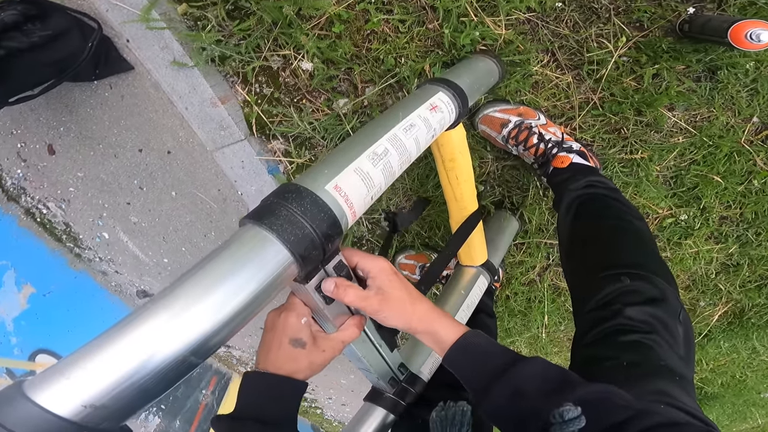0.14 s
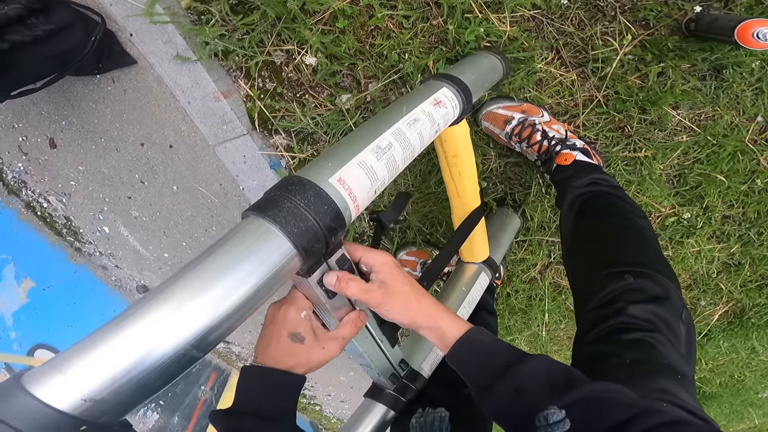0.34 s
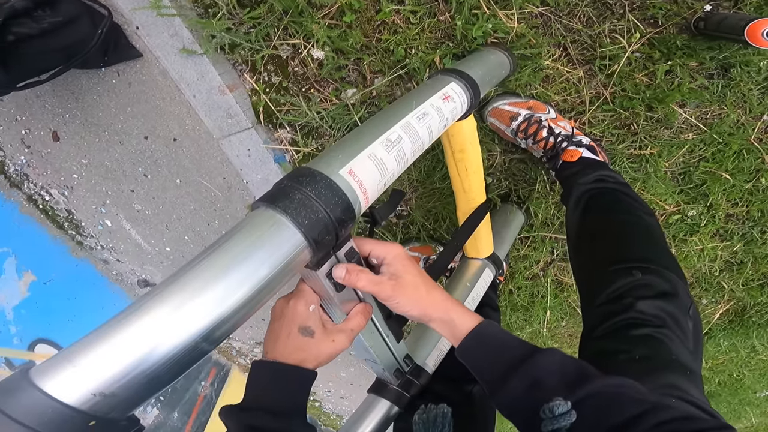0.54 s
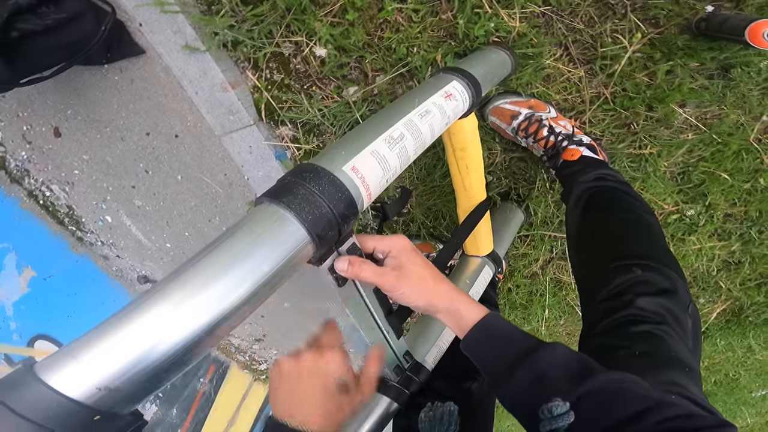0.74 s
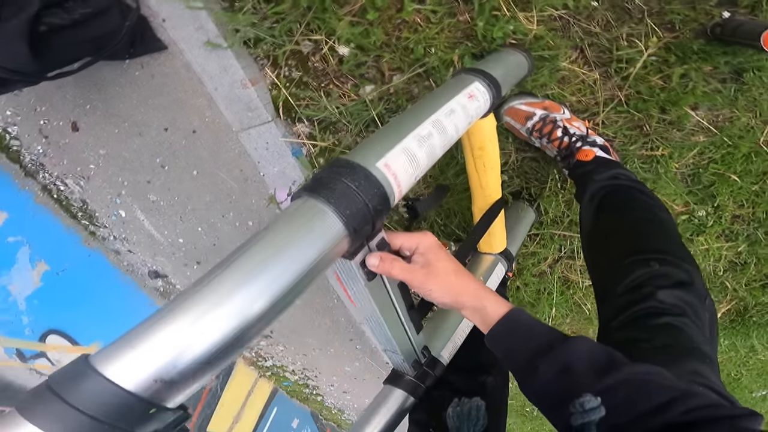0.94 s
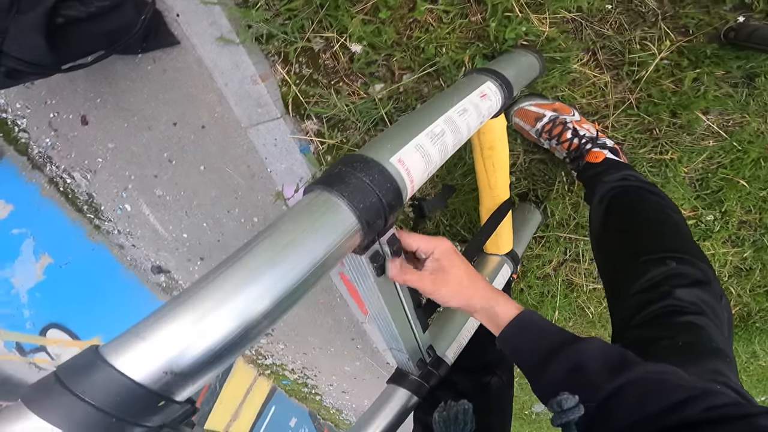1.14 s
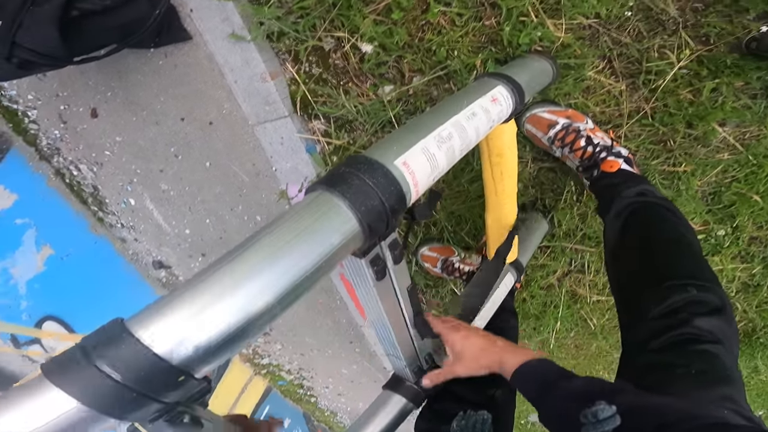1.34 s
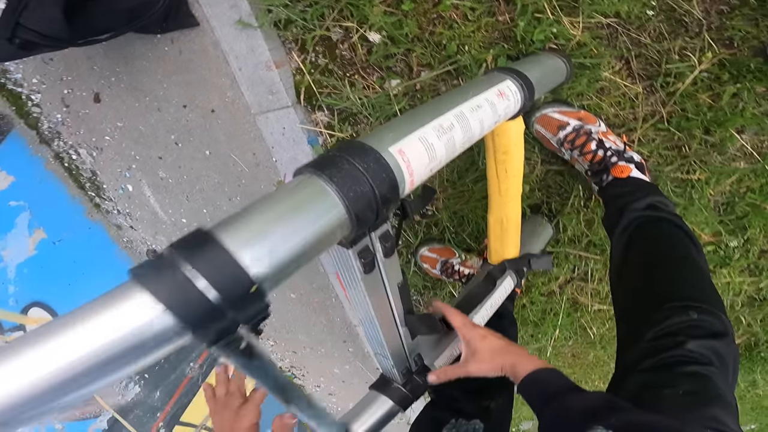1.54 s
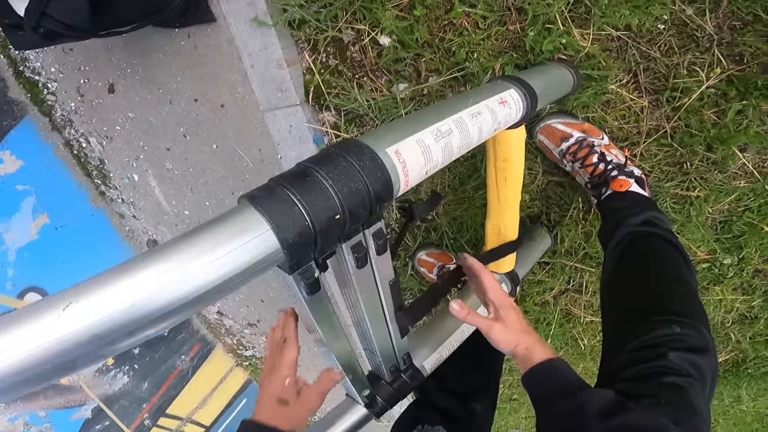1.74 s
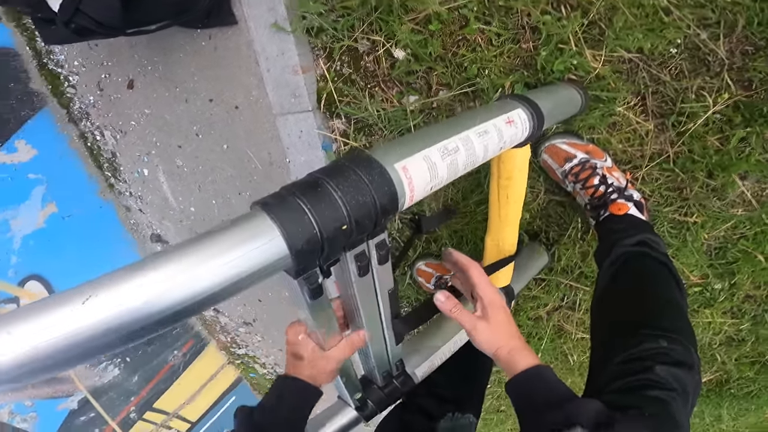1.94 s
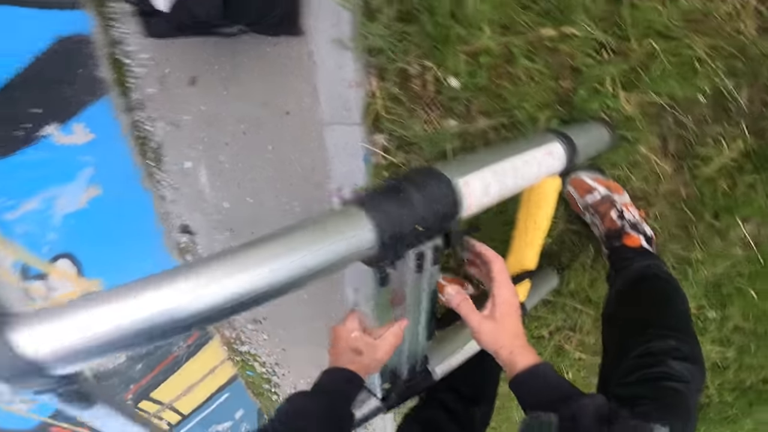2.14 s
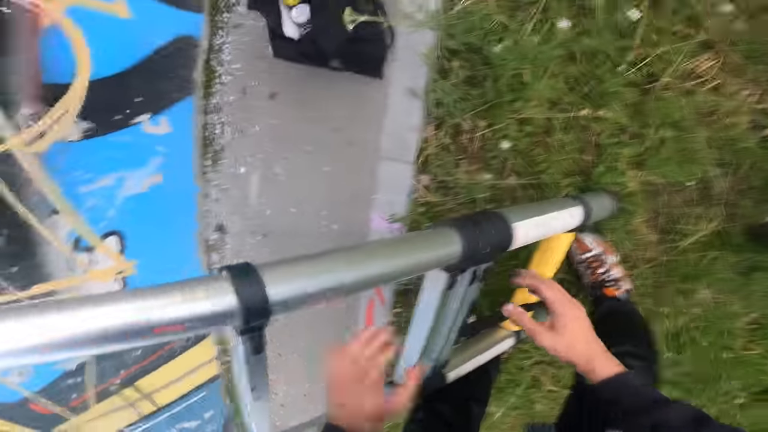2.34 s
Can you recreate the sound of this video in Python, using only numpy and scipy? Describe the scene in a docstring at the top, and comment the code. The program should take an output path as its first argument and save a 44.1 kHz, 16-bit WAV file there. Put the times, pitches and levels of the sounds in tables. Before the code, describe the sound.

A telescopic aluminium ladder is worked by hand, heard close: small plastic clicks, a latch snap, a half-second rasping tube slide, then a hard clack and thud, over low engine-like drone and distant traffic outdoors.

```python
"""A telescopic aluminium ladder is extended by hand outdoors, heard from close by.
Plastic catches click, a latch snaps free, the tubes slide for about half a second and the section
locks with a clack and a thud. Hits are short noise bursts plus decaying sine waves; the slide is
noise mixed with dense tiny grains. Behind it are a low engine-like drone made of two sines, distant
traffic and a sleeve rustle made of coloured noise, and one faint chirp made of gliding sines."""
import sys
import numpy as np
from scipy import signal
from scipy.fft import rfft, irfft
from scipy.io import wavfile
from scipy.ndimage import uniform_filter1d

SR = 44100
rng = np.random.default_rng(int(sys.argv[2]) if len(sys.argv) > 2 else 0)


def unload_wav(signal):
    """Save mono or channel-first audio to the path in sys.argv[1] as 16-bit WAV at rate SR, clipped to [-1, 1]."""
    wavfile.write(
        sys.argv[1],
        SR,
        np.round(np.clip(np.atleast_2d(signal).T, -1, 1) * 32767).astype(np.int16),
    )


N = 105840
T = np.arange(N) / SR  # time of each sample in seconds


def catches():
    """Thumbs work the plastic catches and sections knock in their collars; each click has its own body."""
    # clicks: t/s, level/dB, body f/Hz, body width/octaves, body lift/dB, treble/dB, t60/s
    clicks = [(0.0519, -40, 1870, .12, 12, -4.5, 0.048), (0.1423, -46, 5500, .36, 1, 10, 0.014),
              (.151, -24.5, 3800, 0.23, 10, -9, 0.055), (.153, -37, 864, 0.18, 26, -12, .012),
              (0.1755, -22.5, 2420, 0.12, 10.5, 6.5, 0.021), (0.1786, -28.5, 553, 0.27, 8, -3, 0.037),
              (.179, -26, 4200, 0.2, 15, -6, 0.017), (0.2435, -36.5, 4850, 0.48, 4, 18.5, 0.038),
              (0.3083, -48.5, 4500, .36, 5, -2, 0.0098), (0.3587, -43, 3550, 0.25, 11.5, 15.5, 0.047),
              (0.5824, -49.5, 4500, .36, 8, 18, 0.09), (0.6067, -41.5, 4600, 0.51, 9, 18, 0.035),
              (0.74, -40.5, 3500, 0.31, -4, -3, 0.079), (0.755, -37.5, 3470, 0.29, 13, 14.5, 0.061),
              (0.797, -22.5, 3080, 0.33, 12.5, -17, 0.042), (0.9139, -47, 5530, 0.4, 3, 13, 0.027),
              (1.0308, -37, 5300, .36, -3.5, 13, 0.044), (1.187, -31.5, 3330, .3, 3, -36, 0.07),
              (1.2787, -38, 1450, 0.83, 13, -36, 0.058), (1.6977, -20.5, 2080, 0.28, 9, -13, 0.018),
              (1.707, -19.5, 4650, 0.12, 10, 19, 0.017), (1.798, -33.5, 1255, 0.39, 13, -10, 0.048),
              (1.838, -41, 749, 0.36, 10, -21, 0.03), (1.966, -41.5, 6000, .36, -3, 11, 0.036),
              (2.363, -36.5, 1266, 0.56, 28, 10, 0.033)]
    # basic colour of the plastic: f/Hz, level/dB
    plastic_colour = [(180, -32), (300, -13), (535, 0.5), (700, -6), (900, -3.5), (2000, -1.5),
                      (2310, -3.5), (4190, -3), (5510, -5), (6070, -5), (7480, -16.5), (9830, -20),
                      (14000, -48)]
    # ringing tones of the plastic catch and its collar: f/Hz, level/dB, t60/s
    collar_modes = [(545, -7.5, 0.028), (854, -1, 0.064), (1323, 4, 0.041), (2282, -2, 0.052),
                    (3054, -5, 0.087), (3380, -7, 0.028), (3730, 0.5, 0.047), (3660, -18, 0.061),
                    (4390, -12, 0.054)]
    treble_hz, snap, ring_db = 6580, 0.22, -11.5
    plastic = gains(plastic_colour)
    treble = 1 / (1 + (treble_hz / bins()) ** 4)  # rises from 0 to 1 around treble_hz
    out = 0
    for s, db, hz, octaves, lift, high, t60 in clicks:
        spectrum = plastic + lift * bell(hz, octaves) + high * treble
        out = out + place(strike(spectrum, t60, snap, db, collar_modes, ring_db), s)
    return out


def latch():
    """The latch pins snap out, then shoot home as the section hits its stop and shakes the frame."""
    # blows: t/s, level/dB, centre f/Hz, width/octaves, t60/s, ring against blow/dB, left minus right/dB
    blows = [(1.2094, -16, 2200, 1, 0.014, -5.5, 1.5), (1.2108, -18.5, 1790, 0.53, 0.022, -28, 0.5),
             (1.771, -12.5, 4950, 0.62, 0.0099, -19, 1), (1.7747, -25, 2860, 0.2, 0.03, -36, -5.5),
             (1.7762, -15, 1044, 0.35, 0.033, -15, 3), (1.7793, -17.5, 3230, 0.51, 0.022, -18, -0.5),
             (1.779, -21.5, 365, 0.34, 0.047, -39, 2)]
    # colour of the latch: f/Hz, level/dB
    latch_colour = [(200, 3), (900, 2.5), (6500, 3), (11000, -10), (14000, -25)]
    # ringing tones of the tube and rung: f/Hz, level/dB, t60/s
    tube_modes = [(930, -20, 0.12), (953, -2.5, 0.055), (1130, -16.5, 0.056), (1542, -5.5, 0.036),
                  (1977, 1.5, 0.028), (2110, -14.5, 0.12), (2200, 2.5, 0.018), (2380, 4, 0.023),
                  (3530, -8.5, 0.096), (3630, -11, 0.05), (4010, -9, .03)]
    # tones of the whole frame, shaken at the stop: f/Hz, level/dB, t60/s
    frame_modes = [(43.3, -28.5, 0.44), (98.8, -17.5, 0.2), (266, -16.5, 0.079), (309, -12, 0.056),
                   (431, -14.5, 0.036)]
    stop_s, snap, skirt_db = 1.778, 0.79, -19
    rattle_t60_s, rattle_db = 0.056, -11.5  # blurred ring of the nested tubes after each blow
    out = 0
    for s, db, hz, octaves, t60, ring_db, pan_db in blows:
        # the skirt keeps some sound far away from the centre
        spectrum = 20 * np.log10(bell(hz, octaves) + undb(skirt_db)) + gains(latch_colour)
        rattle = wide(noise(), noise(), spectrum) * fade(rattle_t60_s)
        rattle = blow_level(rattle, db + rattle_db)
        hit = strike(spectrum, t60, snap, db, tube_modes, ring_db)
        out = out + place(hit + rattle, s, pan_db)
    soft_start = 1 - fade(0.0043)
    thud = ring(frame_modes)[None] * soft_start
    return out + place(thud, stop_s)


def slide():
    """Tube rubs in tube: dense tiny catches judder and excite the tubes' resonances."""
    # sliding: t/s, hiss level/dB, scrape level/dB, rumble level/dB
    slide_levels = [(1.24, -59.5, -73, -76), (1.29, -49, -53, -54), (1.345, -42.5, -50.5, -52),
                    (1.366, -44.5, -45.5, -34.5), (1.385, -44, -49, -46.5), (1.425, -41, -51.5, -49),
                    (1.455, -38, -36.5, -45), (1.49, -39.5, -44, -38), (1.515, -39.5, -40, -41),
                    (1.54, -39, -36, -40), (1.565, -40.5, -45.5, -44), (1.62, -38.5, -38, -34),
                    (1.68, -33.5, -36.5, -35.5), (1.73, -39, -39, -33.5), (1.775, -37.5, -33.5, -32.5),
                    (1.81, -57.5, -48, -37), (1.845, -65, -53.5, -34.5), (1.875, -84, -80, -70)]
    # colour of the hiss: f/Hz, level/dB
    hiss_colour = [(1470, -26), (2500, -4), (3290, -0.5), (4290, -0.5), (5520, -0.5), (6200, -2),
                   (9760, -8.5), (12500, -19.5), (14000, -44)]
    # colour of the scrape: f/Hz, level/dB
    scrape_colour = [(350, -11.5), (430, -9.5), (600, -5), (750, -7.5), (872, -5.5), (1210, -6),
                     (1360, -11.5), (1470, -10), (2800, -15.5), (3640, -51)]
    # colour of the rumble: f/Hz, level/dB
    rumble_colour = [(70, -14), (110, 0), (160, 3), (210, -15), (260, -1.5), (400, -18), (650, -27.5)]
    # resonances of the tubes: f/Hz, width/Hz
    tube_peaks = [(883, 51), (1240, 130), (1577, 670), (2025, 120), (2290, 350), (4190, 350), (4620, 130),
                  (6700, 700)]
    grains_per_s, grain_spread_db, resonance_db = 1800, 4, 4
    judder_db, judder_hz = 2.5, 69.52

    def grains():
        """Tiny catches at random moments over a steady noise."""
        hits = (rng.random(N) < grains_per_s / SR) * noise()
        return hits * undb(grain_spread_db * rng.random(N)) + 0.37 * noise()

    shapes = [1 / (1 + (2 * (bins() - hz) / width) ** 2) for hz, width in tube_peaks]
    peaks = resonance_db * np.max(shapes, axis=0)
    judder = judder_db * walk(judder_hz)
    out = 0
    # each layer takes its own share of the judder
    layers = ((hiss_colour, .5), (scrape_colour, 1), (rumble_colour, 1))
    for column, (spectrum, share) in enumerate(layers, start=1):
        rub = wide(grains(), grains(), gains(spectrum) + peaks)
        out = out + rub * sounding(slide_levels, axis=column) * undb(share * judder)
    return out


def strike(spectrum, t60, snap, db, modes, ring_db):
    """A sharp contact, the dense short rattle of the fitting, and the ring of the struck part."""
    mid, side = noise() * fade(t60), noise() * fade(t60)
    mid, side = mid / np.linalg.norm(mid), side / np.linalg.norm(side)
    mid[0] += snap  # the sharp contact is one raised sample
    contact = blow_level(wide(mid, side, spectrum), db)
    return contact + blow_level(ring(modes), db + ring_db)


def ring(modes):
    """Struck tones die away, each slightly detuned; neighbours start in opposite directions."""
    out = 0
    for k, (hz, db, t60) in enumerate(modes):
        detuned_hz = hz * (1 + 0.0047 * rng.standard_normal())
        out = out + (-1) ** k * undb(db) * fade(t60) * np.sin(2 * np.pi * detuned_hz * T)
    return out


def sleeve():
    """Cloth and skin brush along the rungs: soft coloured noise with three brighter swishes."""
    # sleeve and hand rubbing: t/s, level/dB
    rub_levels = [(0, -49), (.1, -64.5), (.37, -62), (.395, -75), (.47, -72), (.55, -60), (.68, -58.5),
                  (.78, -49.5), (.88, -58), (1.06, -53.5), (1.15, -66.5), (1.87, -59), (1.99, -56.5),
                  (2.015, -68), (2.1, -63), (2.15, -65), (2.33, -57.5), (2.4, -63)]
    # colour of the cloth: f/Hz, level/dB
    cloth_colour = [(1200, 3.5), (2800, 0.5), (4200, -1), (6200, -7.5), (8000, -14.5), (11000, -24),
                    (14000, -32.5)]
    # bright swishes of a palm on the tube: t/s, length/s, level/dB
    swishes = [(1.955, 0.06, -52.5), (2.016, 0.07, -52), (2.063, 0.083, -57)]
    # colour of the palm: f/Hz, level/dB
    palm_colour = [(3000, 0.5), (5500, 3), (9000, -3), (12000, -11.5), (14000, -27)]
    swish = 0
    for s, length, db in swishes:
        swish = swish + undb(db) * np.sin(np.pi * np.clip((T - s) / length, 0, 1))
    cloth = wide(noise(), noise(), gains(cloth_colour)) * undb(curve(rub_levels))
    palm = wide(noise(), noise(), gains(palm_colour)) * swish
    return (cloth + palm) * undb(2.6 * walk(130))  # uneven rubbing


def chirp():
    """A faint chirp rises and holds, then splits into two hoarse falling notes, each a shaky sine."""
    # upper note: t/s, f/Hz, level/dB, roughness/share of pitch
    upper_note = [(2.18, 2497, -75, .06), (2.2, 3720, -54.5, 0.098), (2.212, 4140, -47.5, 0.017),
                  (2.224, 4130, -48.5, 0.023), (2.236, 3850, -57, 0.077), (2.265, 3950, -60.5, 0.08),
                  (2.3, 3630, -61, 0.13)]
    # lower, falling note: t/s, f/Hz, level/dB, roughness/share of pitch
    lower_note = [(2.228, 3020, -66, 0.065), (2.245, 3170, -50.5, 0.12), (2.262, 2970, -52.5, 0.13),
                  (2.278, 2720, -51, 0.055), (2.295, 2600, -77, 0.074)]
    jitter_hz = 1800  # how often the pitch takes a new random value

    def note(rows):
        """One sine with a rough pitch and an uneven level."""
        hz = curve(rows) * (1 + curve(rows, axis=3) * walk(jitter_hz))
        tone = np.sin(2 * np.pi * np.cumsum(hz) / SR)
        return unit(tone * undb(1.5 * walk(280))) * sounding(rows, axis=2)

    return note(upper_note) + note(lower_note)


def outdoors():
    """A wavering low sine drone with its octave, a noise rumble that swells with it, and far traffic."""
    # drone: t/s, pitch f/Hz, level/dB
    drone_path = [(0, 58.2, -33.5), (.11, 57.5, -37), (.2, 63, -55), (.38, 61.8, -37.5), (.54, 60.8, -33),
                  (.63, 61.6, -45.5), (.8, 60.03, -33), (1.07, 63.4, -31), (1.14, 62.8, -37.5),
                  (1.22, 66.5, -29), (1.34, 64.9, -31.5), (1.6, 62.95, -36), (1.75, 63.2, -33),
                  (1.95, 61.8, -51), (2.13, 61.55, -66), (2.28, 64.5, -36), (2.4, 63.7, -39)]
    # colour of the traffic: f/Hz, level/dB
    traffic_colour = [(59, -43), (100, -1.5), (124, -7), (207, -12.5), (295, -22), (490, -18), (732, -29.5),
                      (855, -17), (937, -20.5), (1690, -27), (3030, -44.5), (4000, -50), (5200, -57.5),
                      (8800, -120)]
    # rise and fall of the traffic: t/s, level/dB
    wash_levels = [(0, 3), (.3, -1.5), (.6, 3.5), (.9, 5.5), (1.15, 2), (1.9, -1), (2.05, -1), (2.4, 1.5)]
    # colour of the low rumble: f/Hz, level/dB
    low_colour = [(18, -9), (30, 4), (45, 0), (70, 3), (100, -7), (150, -7.5), (200, -20)]
    octave_db, waver_db, traffic_db, rumble_db = -21, 1.4, -47.5, -41
    follow = 0.12  # share of the drone's swell in dB that the rumble follows
    phase = 2 * np.pi * np.cumsum(curve(drone_path) * (1 + 0.015 * walk(13.24))) / SR
    swell = curve(drone_path, axis=2)
    octave = undb(octave_db + 2 * walk(4.3)) * np.sin(2 * phase)
    drone = unit(np.sin(phase) + octave) * undb(swell + waver_db * walk(11.24))
    traffic = wide(noise(), noise(), gains(traffic_colour)) * undb(traffic_db + curve(wash_levels))
    rumble = wide(noise(), noise(), gains(low_colour))
    rumble = rumble * undb(rumble_db + follow * (swell - np.mean(swell)))
    return drone + traffic + rumble


def undb(db):
    """Turn decibels into a gain."""
    return 10 ** (np.asarray(db) / 20)


def unit(x):
    """Scale to an average strength (rms) of 1."""
    return x / np.sqrt(np.mean(x ** 2))


def blow_level(x, db):
    """Scale a hit so that its total energy equals that level held for 7 ms."""
    return x * undb(db) * np.sqrt(.007 * SR / np.sum(x ** 2))


def curve(table, axis=1):
    """One column of a table, joined by straight lines in time."""
    rows = np.array(table)
    return np.interp(T, rows[:, 0], rows[:, axis])


def sounding(table, axis=1):
    """Gain from a column of dB values, fading in before its first row and out after its last in 66 ms."""
    inside = np.minimum(T - table[0][0], table[-1][0] - T)
    return undb(curve(table, axis=axis)) * np.clip(inside / 0.066 + 1, 0, 1)


def bins():
    """Frequency of each spectral bin in Hz, at least 1."""
    return np.maximum(np.arange(N // 2 + 1) * SR / N, 1)


def gains(points):
    """Spectrum in dB on all bins, falling 30 dB per octave beyond its ends."""
    hz, db = np.array(points, float).T
    at = np.log2(bins())
    outside = np.abs(at - np.clip(at, np.log2(hz[0]), np.log2(hz[-1])))
    return np.interp(at, np.log2(hz), db) - 30 * outside


def bell(hz, octaves):
    """A broad resonance, 1 at its centre."""
    return np.exp(-(np.log2(bins() / hz) / octaves) ** 2 / 2)


def colour(x, db):
    """Filter to a spectrum shape, loudest bin near gain 1, with the response starting at once."""
    # folding the cepstrum makes the filter minimum phase: nothing sounds before its cause
    cepstrum = irfft(np.log(undb(db - np.max(db)) + 1e-5), N)
    cepstrum[1:N // 2] *= 2
    cepstrum[N // 2 + 1:] = 0
    return irfft(rfft(x) * np.exp(rfft(cepstrum)), N)


def wide(mid, side, db):
    """Colour a stereo pair whose bass is nearly the same in both ears, with the middle at rms 1."""
    # stereo spread: f/Hz, side against middle level/dB
    spread = [(30, -21), (80, -29.5), (170, -20), (350, -13), (700, -9.5), (1400, -4.5), (2800, -8),
              (5600, -16), (10000, -9), (13000, -1)]
    middle = colour(mid, db)
    edges = irfft(rfft(colour(side, db)) * undb(gains(spread)), N)
    return (middle + edges * np.array([[1], [-1]])) / np.sqrt(np.mean(middle ** 2))


def place(x, s, pan_db=0):
    """Start a sound at its time in seconds, louder on the left for a positive pan."""
    late = np.pad(x, ((0, 0), (int(s * SR), 0)))[:, :N]
    return late * undb(np.array([[pan_db], [-pan_db]]) / 2)


def noise():
    """White noise: every frequency equally strong."""
    return rng.standard_normal(N)


def walk(rate):
    """Smooth random wander of rms 1, with about rate new values per second."""
    k = int(SR / rate)
    steps = np.repeat(rng.standard_normal(N // k + 1), k)
    return unit(uniform_filter1d(steps, k)[:N])


def fade(t60):
    """Exponential decay that falls 60 dB in t60 seconds."""
    return np.exp(-np.log(1000) * T / max(t60, 1e-3))


def scene():
    """The ladder, its faint outdoor reflections as a fading noise tail, and the background."""
    yard_t60_s, yard_db = 0.33, -33
    ladder = catches() + latch() + slide()
    tails = np.array([noise(), noise()]) * fade(yard_t60_s) * (1 - fade(0.026))
    tails = signal.sosfilt(signal.butter(2, 5000, fs=SR, output="sos"), tails)
    echo = signal.fftconvolve(ladder, tails / np.linalg.norm(tails[0]), axes=1)[:, :N]
    return ladder + undb(yard_db) * echo + sleeve() + chirp() + outdoors()


def record(dry):
    """The loudest peaks are flattened and the top is cut."""
    top_hz = 13800
    held = np.clip(dry, -.88, .88)
    return signal.sosfilt(signal.ellip(8, .2, 70, top_hz, fs=SR, output="sos"), held)


dry = scene()
out = record(dry)
unload_wav(out)
```